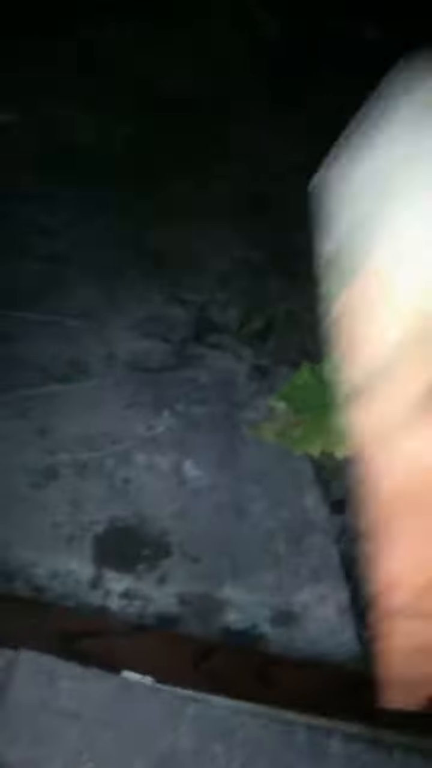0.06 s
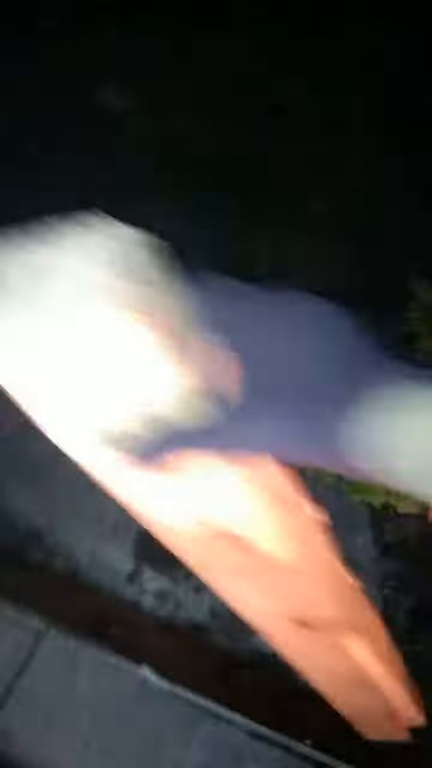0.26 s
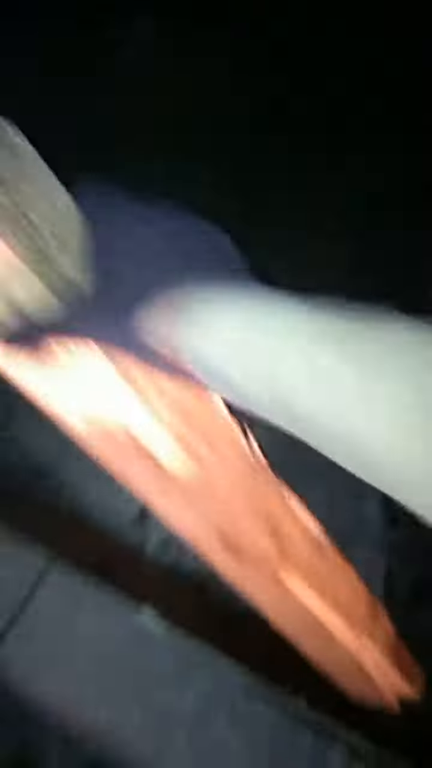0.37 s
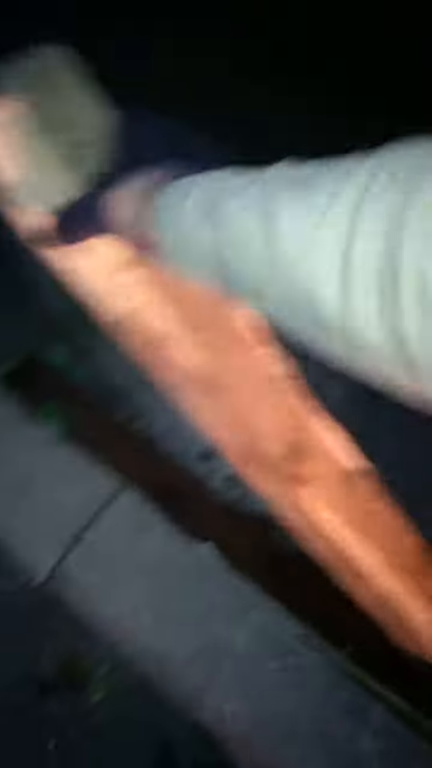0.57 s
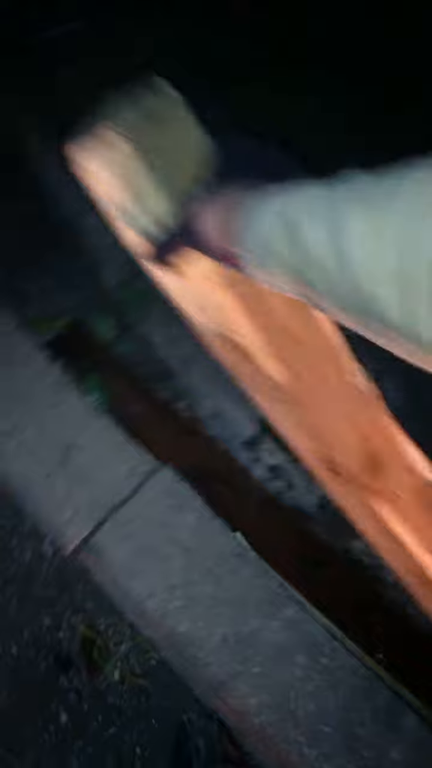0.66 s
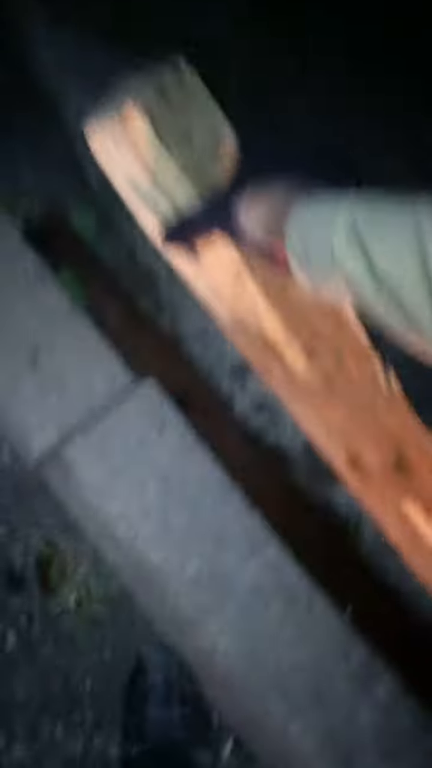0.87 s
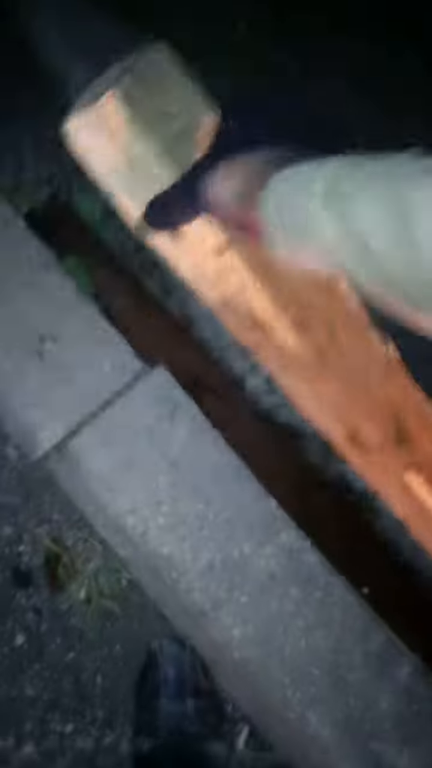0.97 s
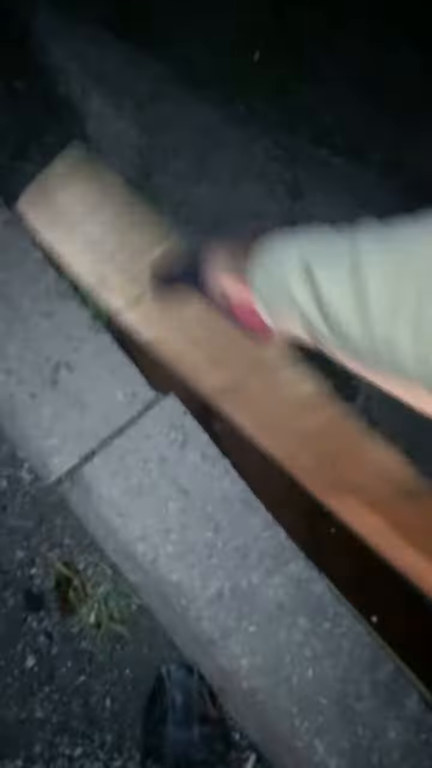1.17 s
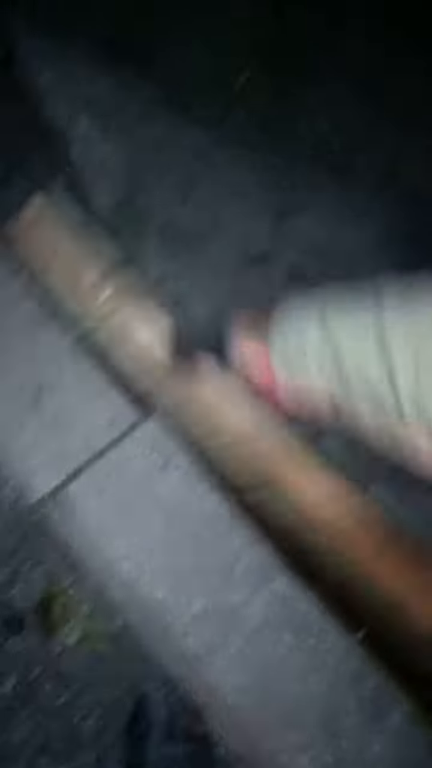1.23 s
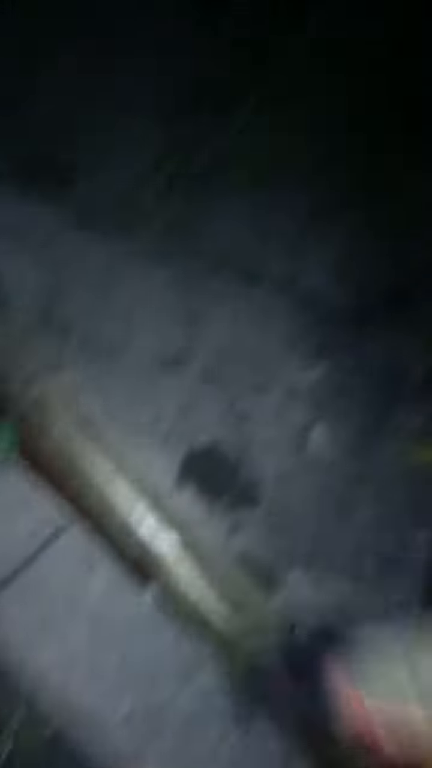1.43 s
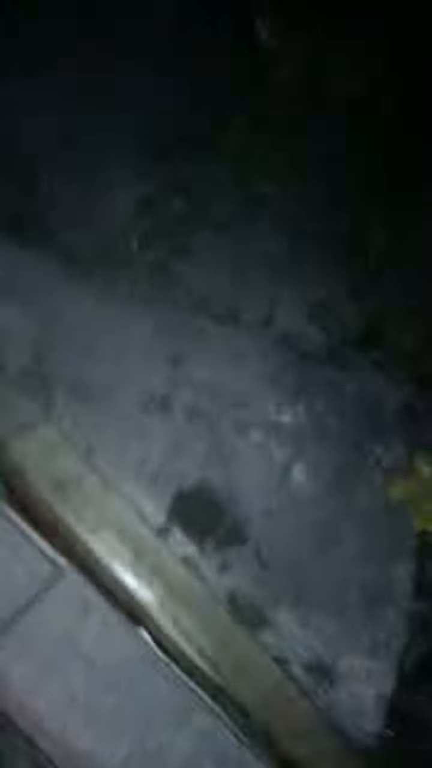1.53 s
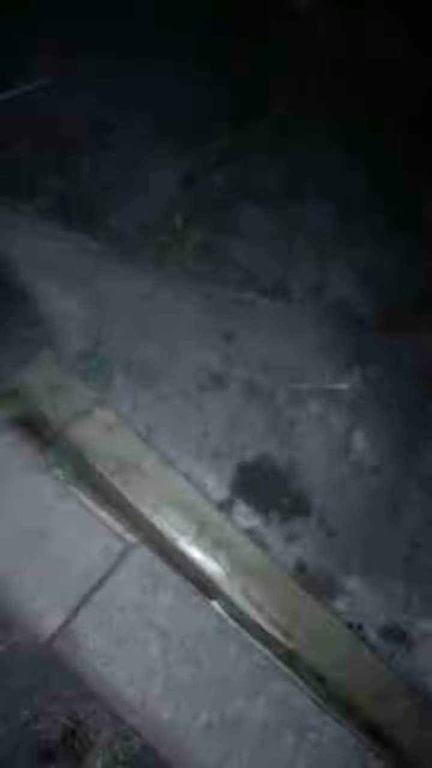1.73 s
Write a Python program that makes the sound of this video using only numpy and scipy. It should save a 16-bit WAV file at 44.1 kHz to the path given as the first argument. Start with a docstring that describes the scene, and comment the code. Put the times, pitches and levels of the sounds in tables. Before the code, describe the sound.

Close up, a wooden log gives two knocks and, after a soft swish of cloth, thuds and clatters onto concrete with snapping grit and rasping bark. The outdoor yard adds a faint echo and a low night rumble.

```python
"""A wooden log knocks twice as it is swung round, then lands along a kerb, clatters and rocks to rest.
Each contact pushes the wood and sets its modes ringing, until the ground damps them.
Grit snaps, stones ping and splinters crush under the blows; the bark rasps as it drags.
Before the landing a sleeve swishes, cloth over cloth. The walls of the concrete yard answer faintly
over a low night rumble with a faint, narrow band of hiss."""
import sys
import numpy as np
from scipy import signal
from scipy.fft import rfft, irfft
from scipy.io import wavfile

SR = 44100
rng = np.random.default_rng(int(sys.argv[2]) if len(sys.argv) > 2 else 0)


def wrap_up_sound(samples):
    """Save the sound to the file named by the first command line argument, as 16-bit audio."""
    columns = np.atleast_2d(samples).T
    # keep every value between -1 and 1, then stretch to whole-number steps
    tamed = np.clip(columns, -1, 1)
    steps = np.round(tamed * 32767).astype(np.int16)
    wavfile.write(sys.argv[1], SR, steps)


N = 79380
T = np.arange(N) / SR

CRACK_DB, CRACK_HZ = -20, 1736   # bright edge of each contact
NODE_DEPTH = 0.69   # how strongly the place of a hit favours or shuts out a mode
FIBRE_DB, FIBRE_T60_S = -5, 0.078   # dense, quickly damped ringing of the grain
GRAINS_PER_S, GRAIN_SPREAD_DB = 3300, 5   # density and unevenness of the gritty textures

# The log's resonances: pitch_hz, relative_db, base_t60_s
LOG_MODES = [(224.2, -24, 0.19), (306, -19, .057), (340.5, -24.5, 0.098), (427.2, -25, 0.086),
             (603.6, -18.5, 0.17), (678, -23, 0.12), (722.5, -28, 0.17), (1059, -32.5, 0.089),
             (1246, -18, 0.057), (1610, -26, 0.077), (1820, -33, 0.064), (2080, -26, 0.074)]
# The ground chokes whatever is already ringing: start_s, extra_decay_db_per_s
GROUND_CHOKES = [(1.379, 200), (1.645, 352)]
# Hits on the log: start_s, level_db, low_hz, high_hz, rebound_gap_s, rebound_share (0-1), ring_db,
# place (0-1 along the log), thud_db, ring_length_factor
LOG_HITS = [(0.2158, -1.7, 199, 845, 0.0028, 0.76, -4.5, 0.07, -24.5, 1.36),
            (0.3558, -6.5, 810, 993, 0.0011, 0, 4.8, 0.5, -38, 0.6),
            (0.3630, -13, 436, 1094, 0.0019, 0.13, 0.5, 0.1, -34, 0.75),
            (0.3680, -16, 220, 457, 0.0035, 0.43, -9, 0.21, -7, 0.93),
            (1.26, -26.5, 212, 900, 0.0053, 0.72, 2, 0.14, 1.5, 1.3),
            (1.3326, -20.5, 1160, 1290, 0.002403, 0.68, 3, 0.11, -35, 1.42),
            (1.3369, -15, 148, 1220, 0.0038, 0.55, 4.2, 0.06, -1, 1.75),
            (1.3524, -21.5, 696, 727, 0.00355, 0.72, 7.5, 0.23, -19.5, 1.3),
            (1.3709, -11, 310, 716, 0.00347, 0.86, -9, 0.12, -11.5, 1.4),
            (1.4594, -2, 675, 1450, 0.0026, 0.67, -10, 0.21, -21.5, 0.32),
            (1.4712, -9, 151, 1490, 0.0078, 0.6, -9.5, 0.38, -19, 1.4),
            (1.4902, -23.5, 208, 815, 0.0049, 0.67, 9, 0.27, -18, 2.14),
            (1.5060, -9, 435.0, 1410, 0.00079, 0.45, -5, 0.5, -12.5, 0.54),
            (1.5492, -23.5, 208, 1275.0, 0.0042, 0.16, -7.5, 0.23, 2, 1.1),
            (1.5739, -11, 505, 754, 0.0024, 0.17, 4.5, 0.14, -11, 0.73),
            (1.6087, -23.5, 587, 784, 0.011, 1, 2, 0.08, -12.5, 1.55)]
def log_knocks():
    """Each contact, with up to two quick rebounds and a thud, pushes the wood and rings its modes."""
    out, t = np.zeros(N), T[:N // 4]
    mode_number = 1 + np.arange(len(LOG_MODES))
    hz, mode_db, t60 = np.transpose(LOG_MODES)[:, :, None]
    tones = from_db(mode_db) * np.cos(2 * np.pi * hz * t) * 2 * np.pi * hz / SR
    thud = pulse(low_hz=164, high_hz=323, order=3)   # the log's weight behind a hit
    for start, db, low_hz, high_hz, gap, rebound, ring_db, place, thud_db, length in LOG_HITS:
        push = pulse(low_hz, high_hz) + from_db(CRACK_DB) * pulse(low_hz, CRACK_HZ)
        bounces = sum(rebound ** k * delayed(push, start + k * gap) for k in range(3))
        force = bounces + from_db(thud_db) * delayed(thud, start)
        mode_gains = 1 + NODE_DEPTH * np.cos(2 * np.pi * place * mode_number)
        choke_db = sum(rate * np.maximum(start + t - when, 0)
                       for when, rate in GROUND_CHOKES if when > start)
        ring = mode_gains @ (tones * from_db(-60 * t / (t60 * length) - choke_db))
        fibre = dying_noise(FIBRE_T60_S)[:len(t)]
        wood = signal.unit_impulse(len(t)) + from_db(ring_db) * ring + from_db(FIBRE_DB) * fibre
        out += from_db(db) * through(force, wood)
    return disperse(out)


def disperse(x, travel_at_1khz_s=0.00122):
    """Bending waves smear each hit: highs run through the wood first, lows trail behind."""
    khz = np.arange(N // 2 + 1) * SR / N / 1000
    lag_cycles = travel_at_1khz_s * 1000 * (2 * np.sqrt(khz) - khz)
    return irfft(rfft(x) * np.exp(-2j * np.pi * lag_cycles), N)


# Brittle EQ for the snaps, also used on the bark's crackle and the cuff: frequency_hz, relative_db
BRITTLE_EQ = [(1500, 13), (2200, 6.5), (3000, -3), (4200, 3.5), (6000, -2), (8500, -12.5), (10600, -16.5),
              (12500, -18.5), (16000, -26)]
# Snaps of grit and splinters: start_s, relative_db, t60_s
GRIT_SNAPS = [(0.217, -35, 0.034), (0.2232, -21.5, 0.017), (0.2291, -18.5, 0.019), (0.2362, -27, 0.053),
              (0.358, -33.5, 0.073), (0.5556, -41, 0.031), (1.265, -42, 0.2), (1.331, -27.5, 0.092),
              (1.3412, -27, 0.052), (1.3616, -23, 0.02), (1.3698, -32.5, 0.033), (1.4600, -33.5, 0.061),
              (1.4715, -35.5, 0.022)]
def grit_snaps():
    """Grit and splinters break in short, sharp bursts of noise."""
    envelope = from_db(-2.5) * sum(burst(*row) for row in GRIT_SNAPS)
    return envelope * coloured(rng.standard_normal(N), BRITTLE_EQ)


# Struck stones: start_s, level_db, pitch_hz
STONE_PINGS = [(1.003, -52, 7200), (1.3412, -29, 5470), (1.3409, -35.5, 10300), (1.5089, -29, 4750),
               (1.633, -33, 4300)]
def stone_pings(t60_s=0.0098):
    """Each small stone rings for an instant on one high note."""
    return sum(burst(start, db, t60_s) * np.sin(2 * np.pi * hz * (T - start))
               for start, db, hz in STONE_PINGS)


# Splinters giving way: start_s, level_db, t60_s
SPLINTER_CRUNCHES = [(0.3553, -36, 0.041), (1.335, -33, 0.1), (1.3628, -29.5, .06)]
def splinter_crunch():
    """Splinters crush in a narrow band of crackle on the second knock and the landing."""
    grains = edge(crackle(GRAINS_PER_S), 1683, "high", order=8)
    grains = edge(grains, 2190, "low", order=10)
    return sum(burst(*row) for row in SPLINTER_CRUNCHES) * grains / grains.std()


# Bark dragging on glove and ground: peak_s, relative_db, rise_s, fall_s
BARK_DRAGS = [(0.233, -43.5, 0.032, 0.05), (0.384, -49.5, 0.16, 0.12), (0.551, -52, 0.023, 0.08),
              (1.348, -47, 0.11, 0.13), (1.463, -44.5, 0.1, 0.18), (1.622, -53, 0.069, 0.087)]
def bark_drag(rasp_db=5, chink_db=13.5):
    """Dragging bark draws a midrange rasp from the wood and a fine crackle from grit and stones."""
    rasp = edge(crackle(GRAINS_PER_S), 443, "high")
    rasp = edge(rasp, CRACK_HZ, "low", order=6)
    grit = coloured(crackle(GRAINS_PER_S) + from_db(chink_db) * stone_chinks(), BRITTLE_EQ)
    envelope = sum(swell(*row) for row in BARK_DRAGS)
    return envelope * (from_db(rasp_db) * rasp / rasp.std() + grit)


def stone_chinks(count=24, low_hz=1683, high_hz=12080, q=41):
    """Random clicks ring loose stones, each at its own pitch."""
    return sum(signal.lfilter(*signal.iirpeak(hz, q, fs=SR), crackle(GRAINS_PER_S / count))
               for hz in rng.uniform(low_hz, high_hz, count))


# Soft cloth EQ: frequency_hz, relative_db
CLOTH_EQ = [(200, -4.5), (700, 2), (1300, -2.5), (2000, -6), (3000, -23.5), (5500, -15), (8000, -30.5),
            (12000, -30.5), (15500, -36)]
# Rise and fall of the swish: time_s, relative_db
SWISH_ENVELOPE = [(0.78, -72.5), (0.858, -46.5), (0.932, -62), (0.99, -85)]
def sleeve_swish(gain_db=13):
    """Cloth slides over cloth in one soft, grainy swish."""
    level_db = np.interp(T, *np.transpose(SWISH_ENVELOPE), left=-np.inf, right=-np.inf)
    return from_db(gain_db + level_db) * coloured(crackle(per_s=10000), CLOTH_EQ)


def cuff_flick():
    """The cuff catches the glove with a thin, bright flick."""
    flick = burst(start_s=0.5275, db=-37.5, t60_s=0.066) * coloured(rng.standard_normal(N), BRITTLE_EQ)
    return edge(flick, 4040, "high", order=4)


def yard_echo(near, level_db=-20.5, t60_s=0.57, predelay_s=0.012):
    """Nearby walls send back a faint, diffuse tail."""
    return from_db(level_db) * delayed(through(near, dying_noise(t60_s)), predelay_s)


# Bass-heavy EQ of the night air: frequency_hz, relative_db
RUMBLE_EQ = [(15, -69), (25, -6.5), (64, -2), (123, -2), (170, -7), (293, -1.5), (463, -10.5), (1130, -19),
             (1940, -30), (2160, -37.5), (2480, -43), (2840, -46), (16000, -67.5)]
def night_rumble(level_db=-40):
    """A steady, low bed of outdoor noise."""
    return from_db(level_db) * coloured(rng.standard_normal(N), RUMBLE_EQ)


# Slow drift of the hiss level: time_s, level_db
HISS_ENVELOPE = [(0.06, -62.5), (0.5, -66), (1.1, -65.5), (1.25, -67)]
def narrow_hiss(centre_hz=2138, width_hz=52):
    """A faint, narrow band of hiss near 2.1 kHz in the background noise."""
    noise = edge(rng.standard_normal(N), centre_hz, "low", order=8)
    hiss = signal.lfilter(*signal.iirpeak(centre_hz, centre_hz / width_hz, fs=SR), noise)
    return from_db(np.interp(T, *np.transpose(HISS_ENVELOPE))) * hiss / hiss.std()


def from_db(db):
    """Decibels to gain."""
    return 10 ** (np.asarray(db) / 20)


def edge(x, hz, kind, order=2):
    """Butterworth high- or low-pass."""
    return signal.sosfilt(signal.butter(order, hz, kind, fs=SR, output="sos"), x + 1e-18)


def coloured(x, eq):
    """Shape a sound with an EQ curve; rms 1."""
    hz, db = np.transpose(eq)
    bin_hz = np.maximum(np.arange(N // 2 + 1) * SR / N, 1)
    y = irfft(rfft(x) * from_db(np.interp(np.log(bin_hz), np.log(hz), db)), N)
    return y / y.std()


def delayed(x, delay_s):
    """The same sound, later."""
    return np.interp(T - delay_s, T, x, left=0)


def through(x, response):
    """Pass a sound through an impulse response."""
    return signal.fftconvolve(x, response)[:N]


def dying_noise(t60_s):
    """A diffuse ring of unit energy."""
    y = rng.standard_normal(N) * from_db(-60 * T / t60_s)
    return y / np.linalg.norm(y)


def pulse(low_hz, high_hz, order=2):
    """A contact pulse between two band edges; peak 1."""
    y = edge(signal.unit_impulse(N), low_hz, "high", order=order)
    y = edge(y, high_hz, "low", order=6)
    return y / abs(y).max()


def crackle(per_s):
    """Random tiny clicks of uneven size."""
    sizes = from_db(GRAIN_SPREAD_DB * np.minimum(rng.exponential(1, N), 4))
    return sizes * rng.choice([-1, 1], N) * (rng.random(N) < per_s / SR)


def burst(start_s, db, t60_s):
    """An envelope with an instant attack and an exponential decay."""
    return from_db(db - 60 * np.maximum(T - start_s, 0) / t60_s) * (T >= start_s)


def swell(peak_s, db, rise_s, fall_s):
    """An envelope that climbs 20 dB during the rise and sinks 20 dB during the fall."""
    return from_db(db - 20 * np.maximum((peak_s - T) / rise_s, (T - peak_s) / fall_s))


def scene():
    """Log, grit and sleeve up close, their echo in the yard, and the night behind; mono."""
    log = log_knocks() + grit_snaps() + stone_pings() + splinter_crunch() + bark_drag()
    near = log + sleeve_swish() + cuff_flick()
    return (near + yard_echo(near) + narrow_hiss() + night_rumble())[None]


def record(dry, cutoff_hz=15900):
    """A steep low-pass trims the very top."""
    return signal.sosfilt(signal.ellip(10, .1, 70, cutoff_hz, fs=SR, output="sos"), dry)


dry = scene()
out = record(dry)
wrap_up_sound(out)
```